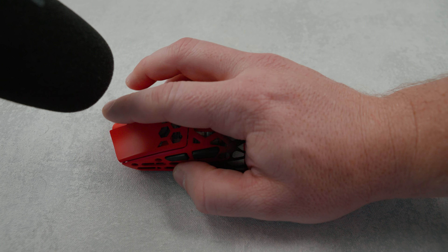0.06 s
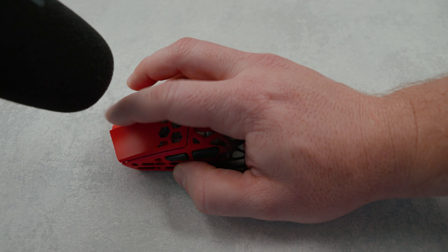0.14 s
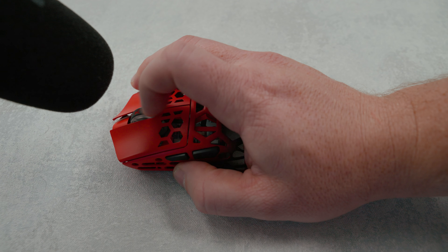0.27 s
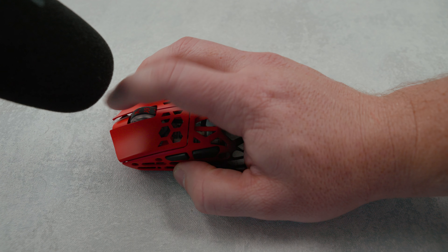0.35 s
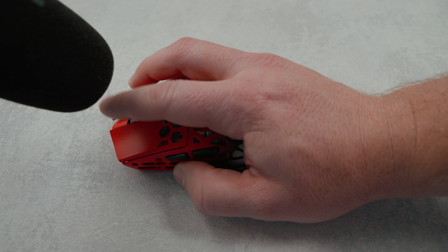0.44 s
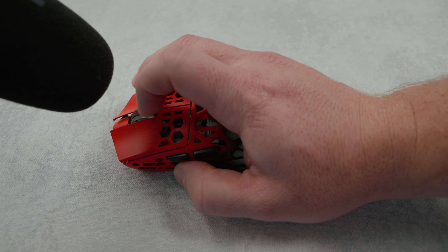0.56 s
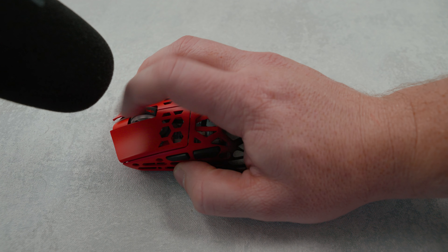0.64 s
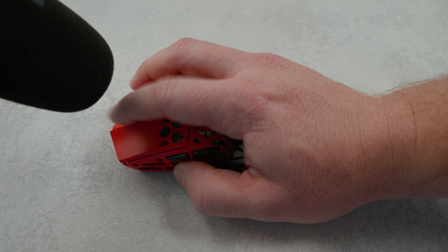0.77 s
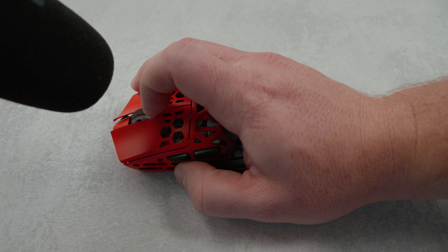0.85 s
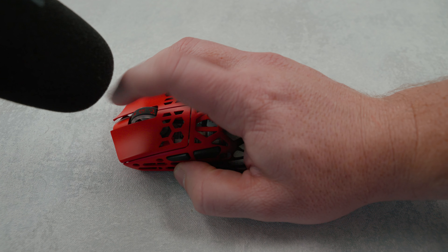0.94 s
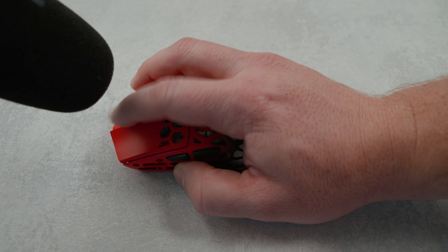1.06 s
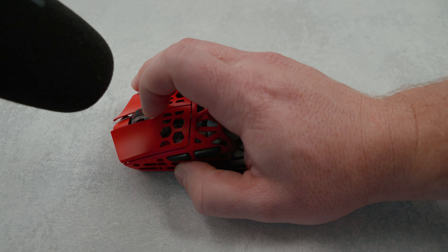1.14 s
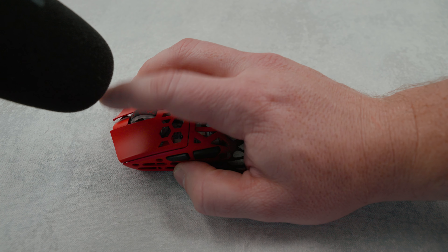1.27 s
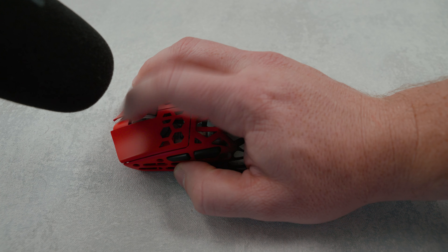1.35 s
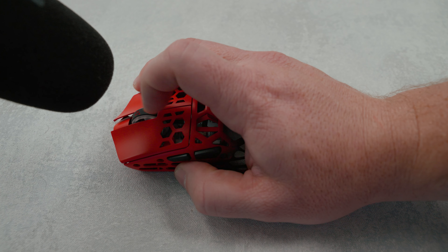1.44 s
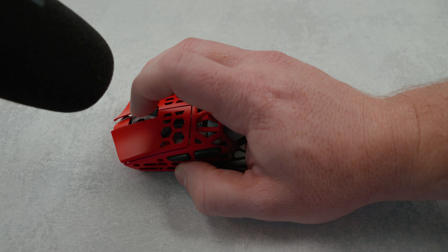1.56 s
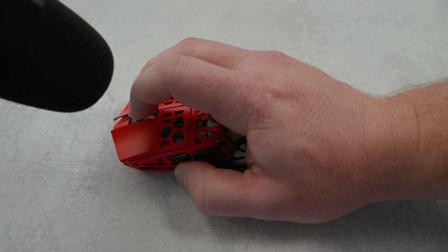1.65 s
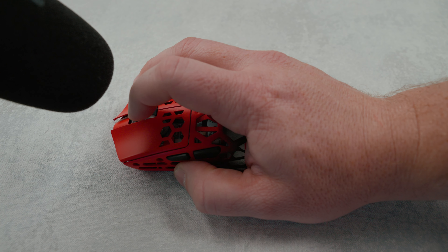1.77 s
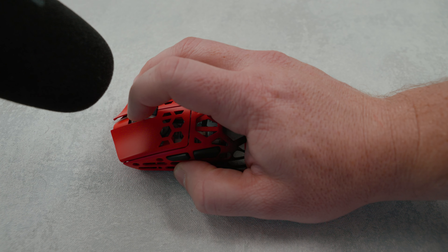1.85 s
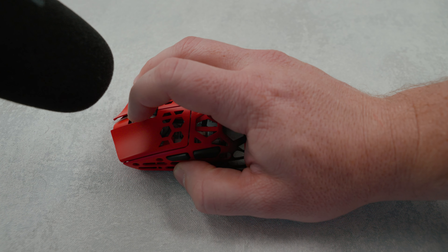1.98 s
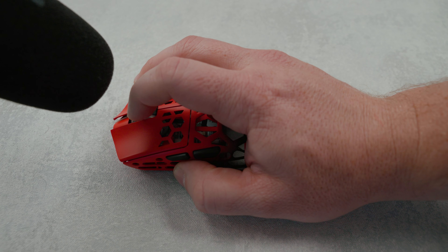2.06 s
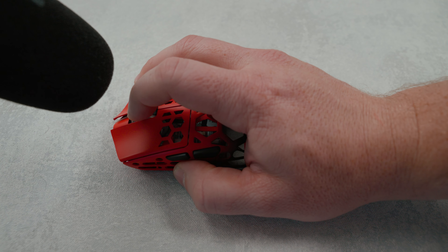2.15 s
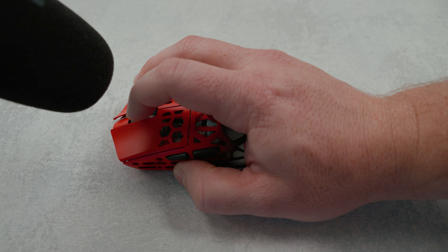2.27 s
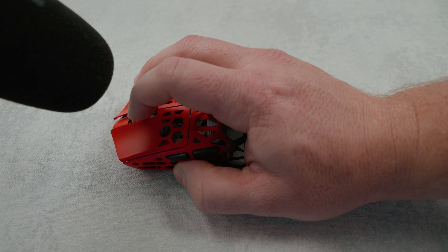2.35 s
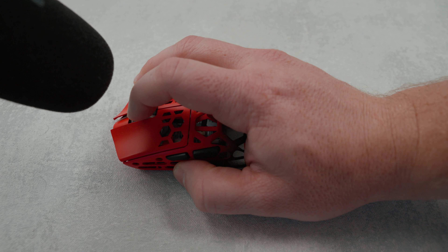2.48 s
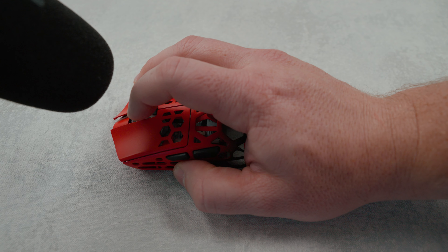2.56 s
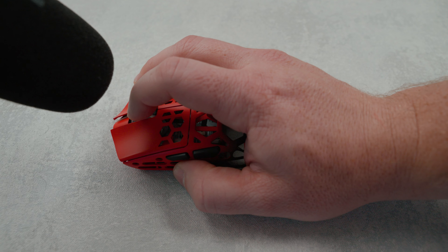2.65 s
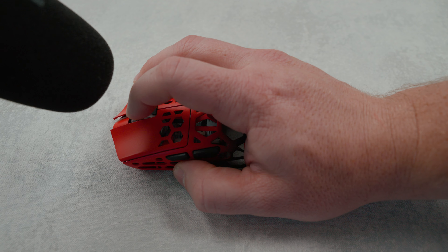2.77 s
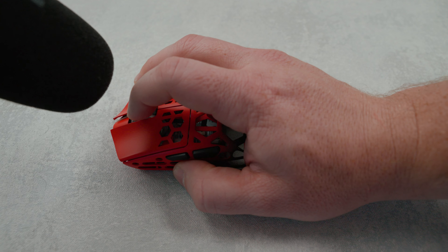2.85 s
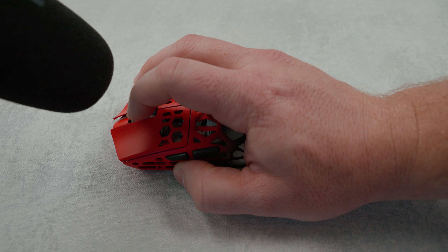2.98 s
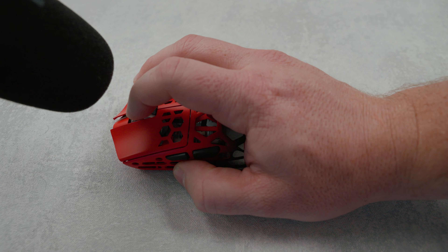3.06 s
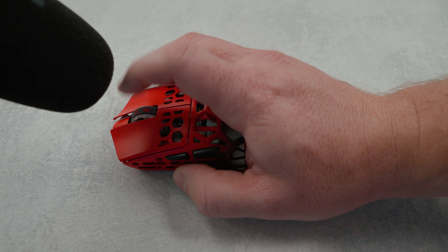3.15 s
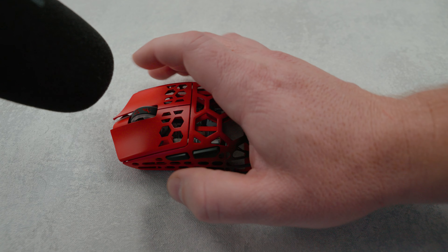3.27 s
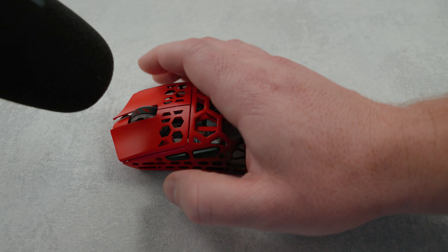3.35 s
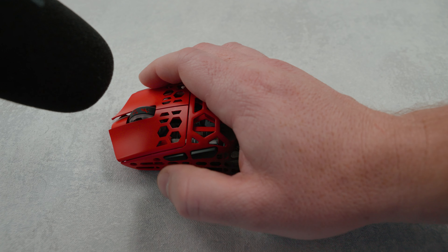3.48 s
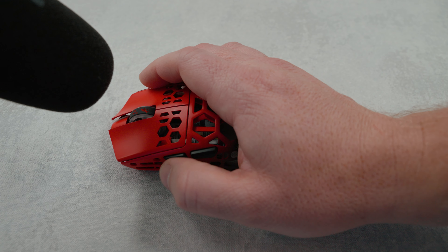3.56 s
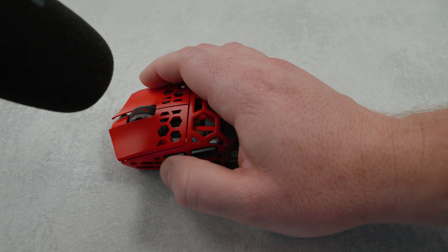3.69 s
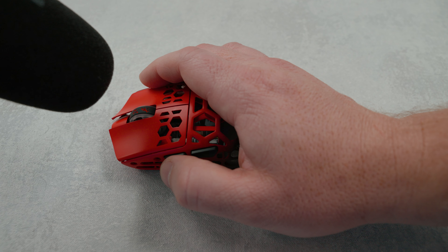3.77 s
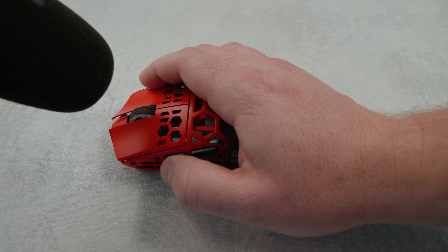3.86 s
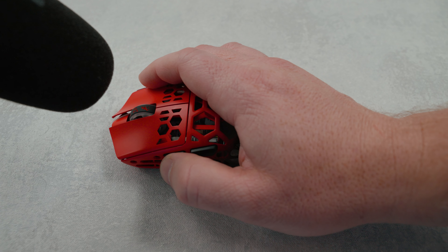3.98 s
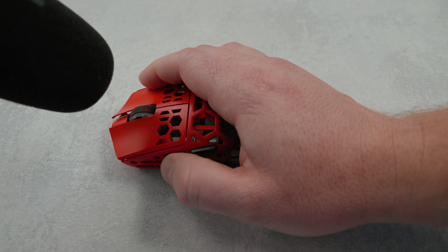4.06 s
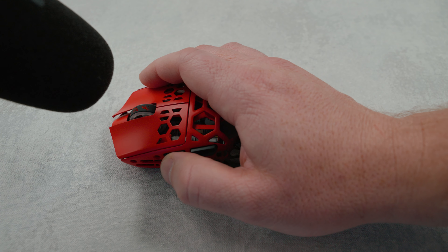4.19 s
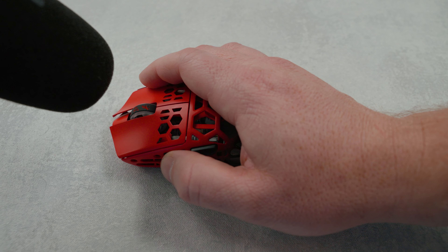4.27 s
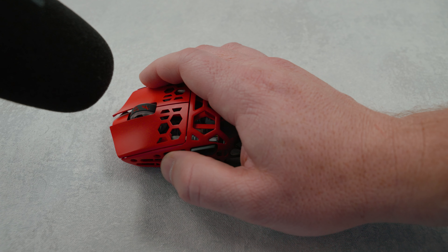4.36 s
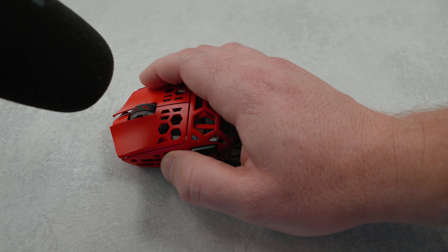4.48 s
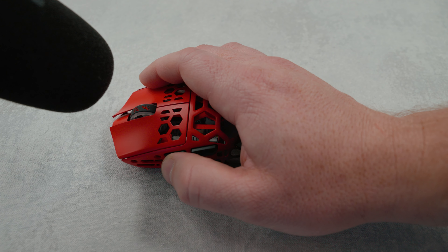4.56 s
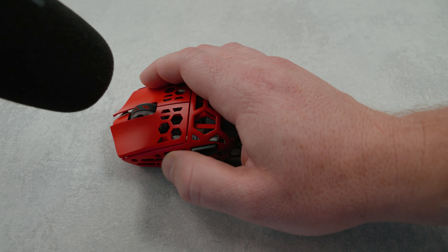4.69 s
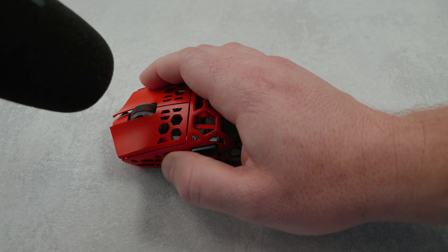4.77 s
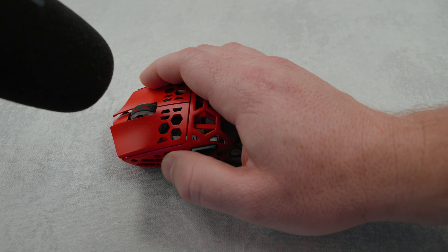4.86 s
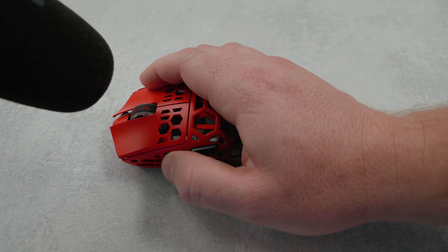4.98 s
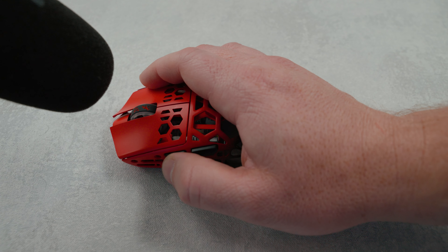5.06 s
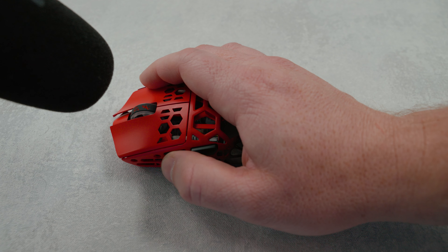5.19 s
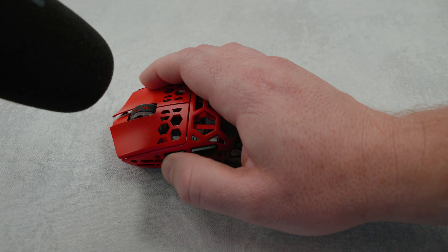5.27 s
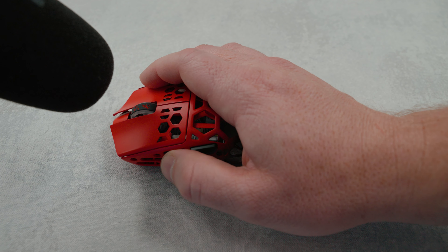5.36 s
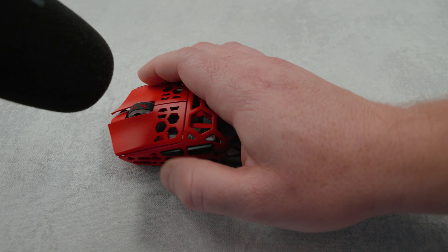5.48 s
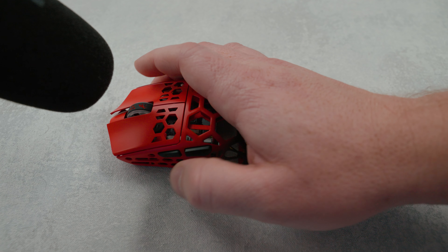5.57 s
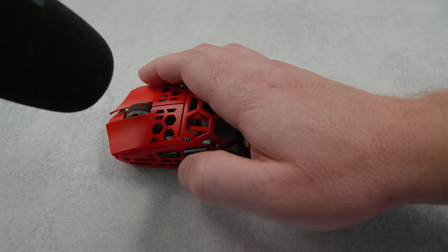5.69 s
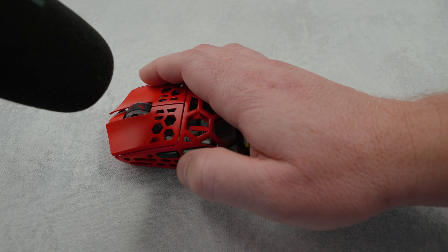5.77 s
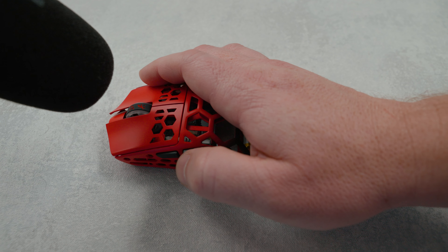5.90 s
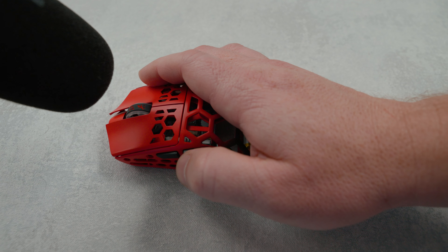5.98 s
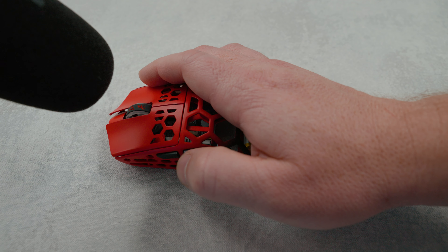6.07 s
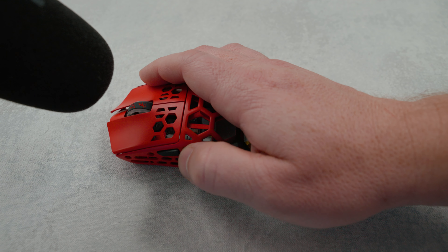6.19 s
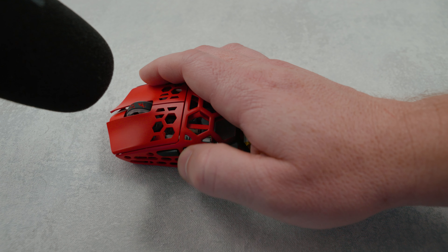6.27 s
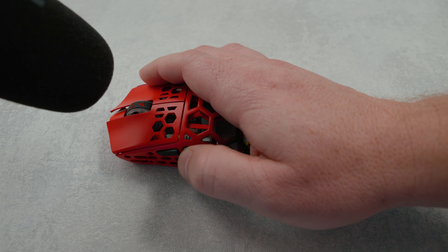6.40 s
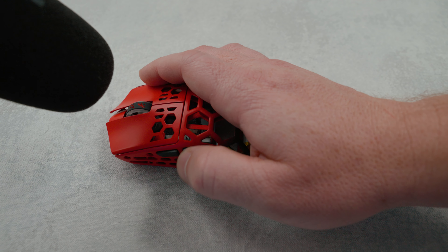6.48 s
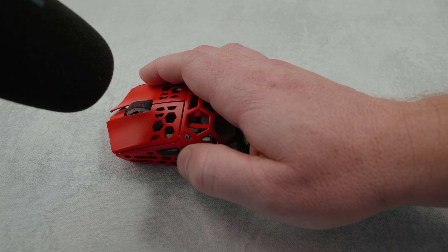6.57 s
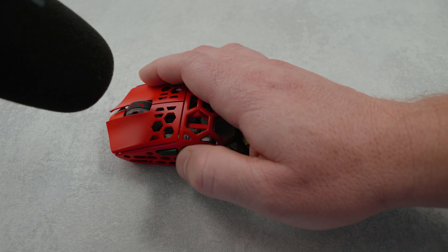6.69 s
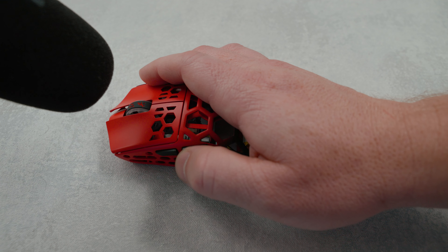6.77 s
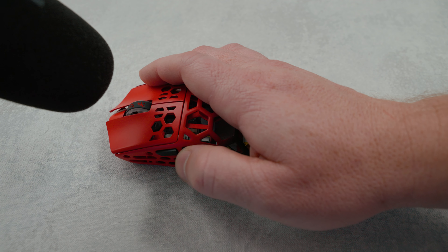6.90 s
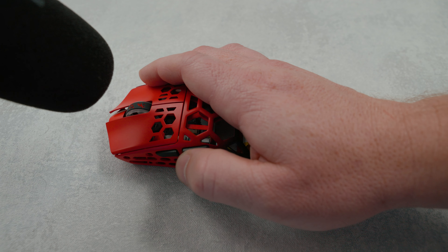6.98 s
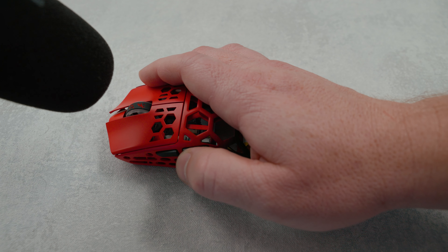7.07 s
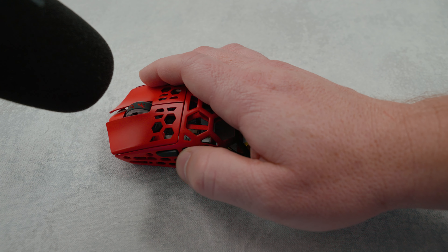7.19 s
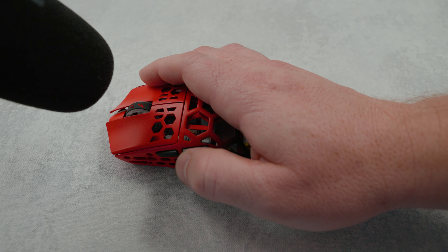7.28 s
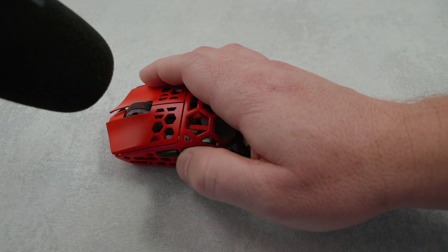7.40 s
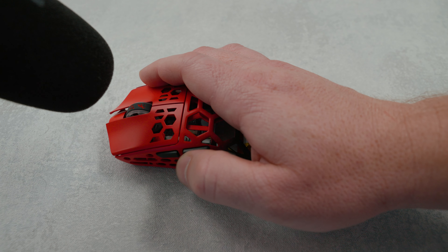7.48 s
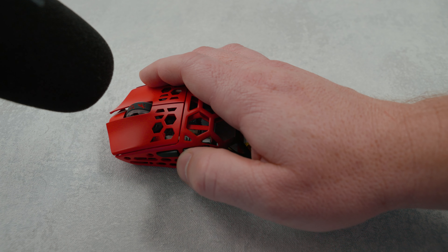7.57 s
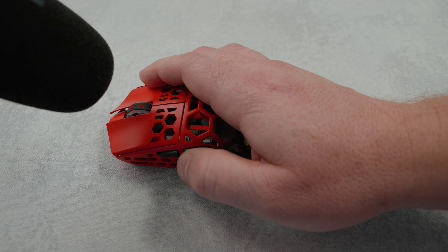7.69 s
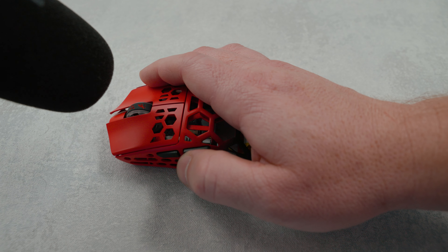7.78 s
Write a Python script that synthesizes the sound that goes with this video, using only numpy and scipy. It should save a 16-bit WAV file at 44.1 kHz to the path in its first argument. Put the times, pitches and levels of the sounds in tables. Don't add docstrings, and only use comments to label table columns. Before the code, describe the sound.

A mouse wheel is flicked five times with short notchy ratchets, then the wheel and two side buttons give sharp, steady double clicks up close.

```python
import sys
import numpy as np
from scipy import signal
from scipy.fft import rfft, irfft
from scipy.io import wavfile
from scipy.ndimage import uniform_filter1d

SR = 44100
rng = np.random.default_rng(int(sys.argv[2]) if len(sys.argv) > 2 else 0)


def linear_from_db(decibels):
    return 10 ** (np.asarray(decibels, float) / 20)


def store_wav(level_fs):
    pcm = np.round(np.clip(np.atleast_2d(level_fs), -1, 1) * 32767)
    wavfile.write(sys.argv[1], SR, pcm.T.astype(np.int16))


N = 345744

# (first notch [s], last notch [s], fingertip drag [dB], desk push [dB])
FLICKS = [
    (0.241, .2908, -34, -25),
    (0.5767, 0.6216, -29, -24.5),
    (0.852, 0.917, -30.5, -25.5),
    (1.137, 1.198, -30, -24),
    (1.409, 1.467, -33, -23.5),
]
# (time [s], peak [dB], shell body [dB])
REAR_PRESSES = [(6.233, -11, 0), (6.4188, -9.5, 0), (6.572, -10.5, 0), (6.7449, -9.5, 0), (6.917, -9.5, 0),
                (7.094, -9.5, 0), (7.246, -11, 0), (7.4143, -10, 0), (7.59, -10, 0), (7.7516, -10, 0)]
# (time [s], peak [dB], shell body [dB])
REAR_RELEASES = [(6.342, -7.5, 0), (6.5075, -7, 0), (6.678, -6.5, 0), (6.854, -8, 0), (7.0154, -8, 0),
                 (7.163, -6, 0), (7.3425, -7.5, 0), (7.512, -7.5, 0), (7.679, -7, 0)]


def evened(x):
    return x / np.sqrt(np.mean(x ** 2) + 1e-20)


def read(points, hz):
    f, value = np.transpose(points)
    return np.interp(np.log(hz + 1), np.log(f + 1), value)


def add(mix, s, sound):
    part = mix[round(s * SR):][:len(sound)]
    part += sound[:len(part)]


def coloured(count, shape_db):
    hz = np.fft.rfftfreq(count, 1 / SR)
    return evened(irfft(rfft(rng.standard_normal(count)) * linear_from_db(shape_db(hz)), count))


def fuzzy(count, hz, width):
    return coloured(count, lambda f: -20 * np.log10(1 + (2 * (f - hz) / width) ** 2))


def hum():
    # (frequency [Hz], density [dB per Hz])
    air_colour = [(35, -19.5), (60, -25), (98, -7.5), (136, 1), (184, -18), (201, -9), (314, -10.5),
                  (378, -12.5), (588, -16), (709, -25.5), (1100, -26), (1490, -31.5), (1970, -35),
                  (2490, -30.5), (15700, -58.5)]
    # (frequency [Hz], width [Hz], level [dB])
    fan = [(1980, 150, -65.5), (1915, 14, -74), (1968, 10, -71), (1990, 8.1, -72.5), (2042, 4.4, -70),
           (2286, 22, -74), (573.5, 36, -60.5), (255.7, 12, -64.5), (313.6, 14.5, -61.5), (162.3, 35, -52)]
    air_db, hiss_db = -45.5, -69.5
    air = coloured(N, lambda f: read(air_colour, f) - 10 * np.log10(1 + (100 / (f + 1)) ** 6))
    bands = sum(linear_from_db(db) * fuzzy(N, f, w) for f, w, db in fan)
    return linear_from_db(air_db) * air + bands + linear_from_db(hiss_db) * rng.standard_normal(N)


def desk():
    # (time [s], level [dB])
    rumble = [(0.0, -46), (1.29, -38.5), (1.79, -47), (3.03, -41.5), (3.58, -46), (6.29, -45),
              (7.62, -42.5), (7.84, -46)]
    # (time [s], peak [dB], frequency [Hz])
    thumps = [(0.296, -26.5, 46), (0.536, -28.5, 49.7), (.636, -25, 60.5), (0.826, -24.5, 53.3),
              (0.916, -26, 65), (1.108, -23, 58), (1.323, -17.5, 67), (1.385, -18.5, 59.6),
              (1.418, -48, 74), (3.189, -28.5, 49.5), (3.216, -26.5, 54.4), (6.548, -31.5, 35.7),
              (6.717, -33, 44.3)]
    s, db = np.transpose(rumble)
    low = coloured(N, lambda f: -10 * np.log10(1 + (f / 95) ** 8) - 10 * np.log10(1 + (22 / (f + 1)) ** 4))
    out = low * linear_from_db(np.interp(np.arange(N) / SR, s, db))
    for s, peak_db, hz in thumps:
        turns = np.linspace(.1, 1.5, round(1.4 * SR / hz))
        fade = signal.windows.tukey(len(turns), .2) * np.exp(-.4 * abs(turns - .7))
        add(out, s, -linear_from_db(peak_db) * np.sin(2 * np.pi * turns) * fade)
    return out


def ticks(events, rise, decay, lead, bright_db, ring_db):
    # (frequency [Hz], density [dB per Hz])
    shell = [(470, -6), (850, -8.5), (1300, -5.5), (1570, -4), (1740, -38), (2070, -5.5), (3100, -9),
             (3300, -4), (3690, -7), (5940, -10), (6910, -14.5), (12600, -28), (16000, -38.5)]
    soft_db, soft_tilt = -42, .08
    t, out = np.arange(1024) / SR, np.zeros(N)
    rattle = (1 - np.exp(-t / rise)) * np.exp(-t / decay)
    for s, peak_db, dull_db, push_db, push_hz in events:
        slope_db = bright_db + soft_tilt * min(peak_db - soft_db, 0)
        body_db = np.clip(dull_db + 9.0, -15, 15)

        def colour_db(f):
            treble_db = slope_db * np.log2(np.maximum(f / 4500, 1))
            return read(shell, f) + treble_db + body_db / (1 + ((f - 1350) / 450) ** 2)

        noise = coloured(len(t), colour_db)
        note = np.sin(2 * np.pi * 1320 * rng.uniform(.94, 1.004) * t)
        note *= linear_from_db(ring_db) * np.exp(-t / 0.012)
        add(out, s - .0005, linear_from_db(peak_db + 2.5) * (rattle * noise + note))
        swing = np.sin(2 * np.pi * np.minimum(push_hz * t, 1))
        add(out, s - lead / push_hz, -linear_from_db(push_db) * swing)
    return out


def knocks():
    # (time [s], peak
    # [dB], dullness [dB])
    taps_and_knocks = [(2.1995, -42, -4), (2.634, -39.5, -16), (2.795, -42, -21), (2.943, -38, 0),
                       (2.975, -29, -15), (3.144, -24.5, -46), (3.193, -29.5, -8), (3.5286, -38.5, -8),
                       (3.575, -44, -13), (3.652, -49, -8), (3.7867, -48, -12), (3.9108, -34, -6),
                       (3.9332, -35, 0), (3.9767, -44, -3), (4.757, -49, 0), (5.524, -37, 2),
                       (5.587, -37, -15), (6, -43, -24),
                       (0.041, -48, -15), (0.239, -30, -10), (0.2452, -20, -27), (.527, -43.5, -9), (0.562, -39, -8),
            (0.6143, -22, -11), (.82, -42, -24), (.8338, -52, -8), (0.946, -39, 8), (1.101, -48, -8),
            (1.1363, -46, -8), (1.1861, -24.5, -21), (1.3816, -34, -24), (1.494, -47, -24),
            (1.3894, -37, 0), (1.4063, -39, -1), (1.446, -20.5, -7)]
    # (time [s], peak [dB])
    creaks = [(2.019, -43), (2.022, -38), (4.193, -42.5), (4.347, -41), (4.426, -47), (4.684, -42),
              (5.384, -38), (5.548, -44), (6.403, -37), (6.999, -50), (7.064, -43), (7.261, -42),
              (7.393, -52)]
    for presses, delay, spread_s, level_db, spread_db in [(REAR_PRESSES[1:], -.019, .0037, -42, 2.2),
                                                          (REAR_RELEASES, .017, .0053, -46, 2.0)]:
        creaks = creaks + [(s + delay + spread_s * rng.standard_normal(),
                            level_db + spread_db * rng.standard_normal()) for s, _, _ in presses]
    events = [(s, db, dull_db, db - 9.5, 88) for s, db, dull_db in taps_and_knocks]
    events += [(s, db, -9, -52, 88) for s, db in creaks]
    return ticks(events, rise=0.00055, decay=0.0027, lead=0.2, bright_db=1.0, ring_db=-28.5)


def rubs():
    # (frequency [Hz], level [dB])
    skin = [(500, -40), (900, -18), (1700, -12), (2250, -3), (3100, 0), (4200, -7), (6000, -17),
            (7800, -21), (10000, -23), (16000, -27)]
    # (start [s], length [s], peak [dB], colour shift [semitones], place of the peak [0-1])
    strokes = [(0.295, 0.038, -48.5, 2.5, 0.6), (0.659, .05, -56.5, 8, .6), (1.035, 0.1, -65.5, 7, .7),
               (3.191, 0.044, -42, 2.5, 0.36), (3.22, 0.07, -28.5, 4.3, 0.31),
               (3.279, 0.14, -40, 0.73, 0.53), (3.405, 0.1, -45.5, 1, 0.6), (3.501, 0.26, -58.5, 5, 0),
               (3.852, 0.059, -61.5, 8, .5), (3.966, .04, -53, 8, 1), (5.594, 0.11, -56, 8.5, 0.83),
               (5.74, .075, -74, 1.3, .6), (6.238, 0.033, -44.5, 7.5, 0.35), (5.522, 0.14, -54, 3.5, 0.7)]
    stroke_hiss = [3, 15, 3, 1, 8, 3.5, 7, 9, 3, 9, 11, 12, 11, 14]
    fall_db, brighten = -13.5, 0.5
    lead_s, tail_s = 0.013, 0.033
    rows = [row + (-3.5, hiss_db) for row, hiss_db in zip(strokes, stroke_hiss)]
    for first, last, db, _ in FLICKS:
        rows.append((first - lead_s, last - first + lead_s + tail_s, db - 21, 4.8, 0.36, -3, 10))
    out = np.zeros(N)
    for s, length, db, semitones, top, rise_db, hiss_db in rows:
        count = round(length * SR)
        u = np.arange(count) / count
        rising_db = rise_db * (1 - u / top) ** 2 if top else 0 * u
        sag_db = np.where(u < top, rising_db, fall_db * ((u - top) / (1 - top)) ** 2 if top < 1 else 0)
        hz, t, z = signal.stft(rng.standard_normal(count), SR, nperseg=256)
        hz = hz[:, None]
        shift = semitones + brighten * np.interp(t, u * length, sag_db)
        hiss = hiss_db / (1 + ((hz - 9700) / 2700) ** 2)
        colour = linear_from_db(read(skin, hz / 2 ** (shift / 12)) + hiss)
        z = z * colour / np.sqrt((colour ** 2).mean(0))
        friction = signal.istft(z, SR, nperseg=256)[1][:count]
        grain_db = 0.71 * evened(uniform_filter1d(rng.standard_normal(count), 90))
        crackle_db = 1.3 * evened(uniform_filter1d(rng.exponential(1, count) ** 2 - 2, 25))
        loudness = linear_from_db(db + sag_db + grain_db + crackle_db)
        add(out, s, friction * loudness * signal.windows.tukey(count, .15))
    return out


def notches():
    # (time [s], peak [dB])
    passed = [
        [(.2525, -28), (.2605, -30), (.2657, -26.5), (.272, -26.5), (.278, -28.5), (.284, -30), (.2907, -27)],
        [(.578, -38.5), (.5868, -32.5), (.5947, -32), (.6012, -29), (.607, -29), (.6125, -34), (.6205, -28)],
        [(.8555, -37.5), (.8648, -33), (.8728, -33), (.8782, -27.5), (.8837, -33), (.8895, -26.5), (.896, -31),
         (.902, -28), (.9095, -31.5)],
        [(1.1423, -42), (1.154, -33.5), (1.1618, -29.5), (1.1677, -29), (1.1727, -32), (1.1787, -26.5),
         (1.1847, -30), (1.19, -33), (1.197, -33)],
        [(1.4138, -37), (1.4245, -34), (1.4328, -30), (1.439, -27.5), (1.4457, -30), (1.451, -28), (1.456, -30),
         (1.4625, -38)],
    ]
    rows = []
    for (_, _, _, push_db), flick in zip(FLICKS, passed):
        s, db = np.transpose(flick)
        fading_db = push_db - 9 * np.arange(len(s)) / len(s)
        rows += zip(s, db, -4 + 0 * s, fading_db, 1 / np.gradient(s))
    return ticks(rows, rise=0.00058, decay=0.0031, lead=0.435, bright_db=2.5, ring_db=-17.5)


def squeaks():
    # (time [s], length [s], level [dB])
    stops = [
        (.292, 0.038, -52),
        (.338, 0.016, -52),
        (0.908, 0.013, -50),
        (.92, 0.031, -65),
        (1.196, 0.006, -45),
        (1.2, 0.021, -60),
        (1.479, 0.013, -54.5),
    ]
    # (frequency [Hz], width [Hz], level [dB])
    axle = [(5000, 490, 4), (7870, 1400, 1), (12700, 800, -2)]
    # (time [s], length [s], level [dB], frequency [Hz], width [Hz])
    whistle = (5, 0.3, -60.5, 4700, 600)
    out = np.zeros(N)
    for s, length, db in stops:
        count = round(length * SR)
        tone = sum(linear_from_db(g) * fuzzy(count, f, w) for f, w, g in axle)
        add(out, s, linear_from_db(db) * tone * signal.windows.tukey(count, .4))
    s, length, db, hz, width = whistle
    count = round(length * SR)
    add(out, s, linear_from_db(db) * fuzzy(count, hz, width) * np.hanning(count))
    return out


def hollows():
    times = [1.324, 2.974, 2.975, 3.145, 3.193, 3.91, 3.933, 3.934]
    # (peak [dB], frequency [Hz], t60 [s])
    hollow_notes = [
        (-22.5, 280, 0.012),
        (-36, 1290, 0.043),
        (-19.5, 2980, 0.01),
        (-27.5, 1360, 0.024),
        (-24, 3400, 0.012),
        (-22.5, 2900, 0.011),
        (-26.5, 2500, 0.015),
        (-30, 1400, 0.027),
    ]
    t, out = np.arange(2048) / SR, np.zeros(N)
    for s, (db, hz, t60) in zip(times, hollow_notes):
        pair = np.sin(2 * np.pi * hz * t) + 0.73 * np.sin(2 * np.pi * hz * 1.09 * t)
        add(out, s, linear_from_db(db - 60 * t / t60) * (1 - np.exp(-t / 0.00075)) * pair)
    return out


def switch(events, modes, spring, motion, gap_hz, crack_db, thud_db, after_db):
    body_hz = 5920
    lead_s, bounce_s, crack_peak_s = .001, .0017, .0019
    after_t60, after_width_hz, after_fill_db = 0.115, 750, -3
    chatter, ring, rise, bounce_db = motion
    hz, width, db = np.transpose(modes)[:, :, None]
    t, long_t, out = np.arange(1024) / SR, np.arange(8192) / SR, np.zeros((2, N))
    phase = np.pi * np.arange(len(modes))[:, None] ** 2 / len(modes)
    loss = np.pi * np.maximum(width, 125) * (1 + hz / 12000)
    dying = np.exp(-loss * (0.2 * t + ring * np.maximum(t - chatter, 0)))
    shape = (1 - np.exp(-t / rise)) ** 2 * dying
    height_db = 20 * np.log10(linear_from_db(db) * shape.sum(1, keepdims=True))
    height_db = height_db - height_db.max()
    outline = np.hstack([hz, height_db])
    thud = np.sin(2 * np.pi * 210 * t) * np.exp(-t / 0.0015)
    rattle = (t / crack_peak_s * np.exp(1 - t / crack_peak_s)) ** 1.6
    for s, peak_db, body_db in events:
        a, b, c = rng.standard_normal((3, len(modes), 1))
        mode_db = db + 1.5 * a + body_db / (1 + (hz / body_hz) ** 6)
        tones = np.sin(2 * np.pi * hz * (1 + .005 * b) * t + phase + .3 * c)
        snap = (linear_from_db(mode_db) * shape * tones).sum(0)
        crack = rattle * coloured(len(t), lambda f: read(outline, f) - np.maximum(f - hz.max(), 0) / 40)
        blow = linear_from_db(peak_db) * (0.11 * evened(snap) + linear_from_db(min(crack_db, -16)) * crack)
        blow = signal.lfilter(*signal.iirnotch(gap_hz, 20, SR), blow)
        add(out[0], s - lead_s, blow)
        add(out[0], s - lead_s + bounce_s, linear_from_db(bounce_db) * blow)
        add(out[1], s, linear_from_db(peak_db + thud_db) * thud)

        def blurred_db(f):
            humps = linear_from_db(2 * height_db + 2 * a) / (1 + (2 * (f - hz) / after_width_hz) ** 4)
            return 10 * np.log10(linear_from_db(2 * after_fill_db) + humps.sum(0)) - f / 1500

        fade = (1 - np.exp(-long_t / 0.0016)) * linear_from_db(peak_db + after_db - 60 * long_t / after_t60)
        add(out[1], s, fade * coloured(len(long_t), blurred_db))
        for f, w, spring_db, t60 in spring:
            f, spring_db = np.array([f, spring_db]) + [0.011 * f, 1.5] * rng.standard_normal(2)
            fade = (1 - np.exp(-long_t / 0.0011)) * linear_from_db(peak_db + spring_db - 60 * long_t / t60)
            add(out[1], s, fade * fuzzy(len(long_t), f, w))
    return out


def clicks():
    # (time [s], peak [dB], shell body [dB])
    wheel_down = [(2.0372, -5, -1), (2.2273, -6, 2.5), (2.377, -6, -2), (2.555, -6.5, 0), (2.728, -7, -1.5),
                  (2.8809, -6.5, 0), (3.0297, -5, -4.5)]
    wheel_up = [(2.1279, -0.3, 0.24), (2.3136, -0.08, -1.6), (2.4864, -0.32, 1), (2.6477, -0.5, 0.53),
                (2.8055, -0.84, 1), (2.9531, -0.5, 0.54), (3.1096, -0.82, -0.44)]
    front_down = [(3.9967, -10, 0), (4.167, -11, 0), (4.3274, -9, 0), (4.513, -9, 0), (4.673, -9.5, 0),
                  (4.8559, -10.5, 0), (5.026, -10, 0), (5.2044, -8.5, 0), (5.3751, -10, 0)]
    first_up = [
        (4.0535, -6.5, 0),
    ]
    front_up = [(4.2553, -6, 0), (4.4393, -6, 0), (4.6072, -5.5, 0), (4.783, -6.5, 0), (4.9493, -6.5, 0),
                (5.1081, -7, 0), (5.3118, -7, 0), (5.4898, -7, 0.29)]
    # (frequency [Hz], width [Hz], level [dB])
    wheel_down_modes = [(1310, 150, -39.5), (3180, 890, -6.0), (4950, 800, -1.5), (5960, 200, -3.0),
                        (6870, 270, -13.5), (7450, 140, -5.0), (8340, 900, 0.0), (9050, 140, -15.0),
                        (9770, 390, -8.5), (10970, 70, -13.0), (11930, 390, -13.5), (13080, 170, -13.5),
                        (13770, 90, -13.5), (14710, 170, -14.0)]
    wheel_up_modes = [(1290, 300, -24.0), (2340, 370, -22.0), (3180, 780, -14.5), (4350, 310, -10.0),
                      (5010, 190, -3.5), (6040, 470, 0.0), (6920, 110, -4.5), (7560, 230, -4.5),
                      (8500, 630, -3.5), (9280, 320, -10.5), (10800, 680, -1.0), (12500, 690, -3.0),
                      (14060, 200, -6.5), (15250, 700, -1.5)]
    front_down_modes = [(2710, 870, -21.5), (3410, 900, -18.0), (4090, 900, -16.0), (5630, 900, -8.0),
                        (7230, 900, -15.0), (7910, 140, -16.5), (8560, 110, -19.5), (9130, 70, -8.0),
                        (10250, 900, -11.0), (11090, 900, -12.5), (12000, 560, -22.5), (12840, 900, -13.0),
                        (14780, 900, -5.0), (15350, 810, 0.0)]
    first_up_modes = [(2800, 900, -8), (5690, 900, -4.5), (7400, 70, -16), (7980, 80, -7),
                      (8250, 900, -4.5), (8940, 820, -.5), (10120, 140, -13), (10910, 90, -4),
                      (11770, 330, -17.5), (12600, 420, -14), (13610, 850, 0), (14180, 140, -11),
                      (14820, 370, -13.5), (15310, 80, -9)]
    front_up_modes = [(2590, 900, -21), (3340, 880, -22), (4370, 830, -20), (5010, 900, -12.5),
                      (5960, 900, -15), (7870, 890, -6.5), (8560, 160, -14.5), (9100, 870, -11.5),
                      (10250, 900, -7), (11000, 200, -13.5), (11730, 900, -12), (13490, 330, -8),
                      (14250, 900, -1.5), (15550, 640, -6.5)]
    rear_down_modes = [(1320, 290, -24.5), (2440, 640, -11.0), (3400, 120, -25.5), (4410, 330, -7.0),
                       (4940, 90, -18.0), (5500, 480, -6.5), (6560, 590, 0.0), (7400, 400, -9.5),
                       (8320, 420, -1.5), (9320, 80, -6.0), (10850, 900, -6.0), (12790, 580, -3.5),
                       (14090, 310, -0.5), (15600, 140, -7.5)]
    rear_up_modes = [(2380, 860, -13), (3380, 240, -19.5), (4900, 730, -11), (5760, 380, -9),
                     (6550, 170, -11), (6880, 490, -5.5), (8000, 280, -8), (8790, 150, -19), (9280, 860, 0),
                     (11240, 740, -10.5), (12050, 380, -8), (13520, 250, -10), (14670, 200, -13),
                     (15360, 260, -7)]
    # (frequency [Hz], width [Hz], level below the snap [dB], t60 [s])
    wheel_down_spring = [(7050, 400, -39.5, .18), (5600, 400, -48.5, 0.19), (9250, 1300, -46, 0.21),
                         (13500, 1500, -60.5, .15)]
    wheel_up_spring = [(7160, 900, -43.5, 0.18), (4360, 220, -48, .1), (10400, 700, -52.5, 0.27),
                       (12160, 900, -55, 0.17), (14500, 1200, -56.5, .15)]
    front_down_spring = [(9250, 120, -44.5, 0.18), (9500, 2000, -50, 0.21), (5530, 300, -53, .2),
                         (7600, 400, -49, 0.16), (15040, 1500, -56, .2)]
    front_up_spring = [(8500, 200, -51, 0.25), (9300, 2400, -48, 0.21), (10900, 500, -55, .2),
                       (5500, 400, -54.5, 0.22), (14800, 1800, -58, .25)]
    rear_down_spring = [(9020, 200, -51, 0.17), (8900, 1200, -41, 0.21), (5300, 700, -42.5, 0.16),
                        (13900, 300, -56, .15), (15500, 250, -58, .15)]
    rear_up_spring = [(8730, 500, -41, .2), (9300, 1700, -42, 0.17), (5370, 680, -47, 0.16),
                      (12200, 500, -57, .2), (14800, 1800, -54, .22)]
    # (chatter [s], damping share [0-1], rise [s], bounce [dB])
    motions = [
        (.0011, 1, .0012, -20),
        (.001, 1, .0012, -22),
        (.0023, 1, .00021, -22),
        (.0029, .28, .0002, -22),
        (.0027, 1, .0003, -22),
        (.00075, 1, .0012, -20),
        (.00066, .85, .0009, -22),
    ]
    gaps = [7900, 5480, 6450, 6900, 6600, 13350, 10300]
    # (crack [dB], thud [dB], lingering modes [dB])
    layers = [
        (-17, -15.5, -40.5),
        (-13, -23, -46),
        (-16.5, -25.5, -40),
        (-19, -32.5, -39),
        (-22.5, -45, -39),
        (-21, -23.5, -36.5),
        (-14, -42, -41),
    ]
    parts = [(wheel_down, wheel_down_modes, wheel_down_spring),
             (wheel_up, wheel_up_modes, wheel_up_spring),
             (front_down, front_down_modes, front_down_spring),
             (front_up, front_up_modes, front_up_spring),
             (first_up, first_up_modes, front_up_spring),
             (REAR_PRESSES, rear_down_modes, rear_down_spring),
             (REAR_RELEASES, rear_up_modes, rear_up_spring)]
    return sum(switch(*part, motion, gap_hz, *layer)
               for part, motion, gap_hz, layer in zip(parts, motions, gaps, layers))


def creeps():
    slips = [5.7475, 5.79, 5.861, 5.8815, 5.902, 5.9235, 5.97]
    events = [(s, -52.5, -20, -60, 88) for s in slips]
    return ticks(events, rise=.002, decay=0.0037, lead=0.28, bright_db=9, ring_db=-32)


def room(x, tail_db):
    # (frequency [Hz], t60 [s])
    walls = [(1000, 0.62), (4000, 0.42), (9000, 0.26), (16000, 0.034)]
    # (delay [s], level [dB])
    echoes = [
        (0.0092, -29),
        (0.02, -39.5),
    ]
    hz, t, z = signal.stft(rng.standard_normal(SR // 3), SR, nperseg=128)
    tail = signal.istft(z * linear_from_db(-60 * t / read(walls, hz)[:, None]), SR, nperseg=128)[1]
    tail = linear_from_db(tail_db) * tail / np.linalg.norm(tail) * np.minimum(np.arange(len(tail)) / 200, 1)
    for s, db in echoes:
        smear = signal.lfilter(*signal.butter(2, 9500, fs=SR), rng.standard_normal(40))
        add(tail, s, linear_from_db(db) * smear / np.sqrt(20))
    return signal.fftconvolve(x, tail)[:N]


def scene():
    small = knocks() + notches() + hollows() + creeps()
    snaps, springs = clicks()
    soft = springs + small + rubs() + squeaks()
    soft += room(snaps + soft, tail_db=-30) + desk() + hum()
    soft = signal.oaconvolve(soft, signal.firwin(255, 15950, fs=SR), "same")
    return (snaps + soft)[None]


def top_cut(x):
    return signal.sosfilt(signal.butter(12, 17160, fs=SR, output="sos"), x)


def record(dry):
    rounded = .95 * np.tanh(dry / .95)
    limited = signal.sosfilt(signal.cheby1(10, .3, 16450, fs=SR, output="sos"), rounded)
    return top_cut(limited)


dry = scene()
out = record(dry)
store_wav(out)
```